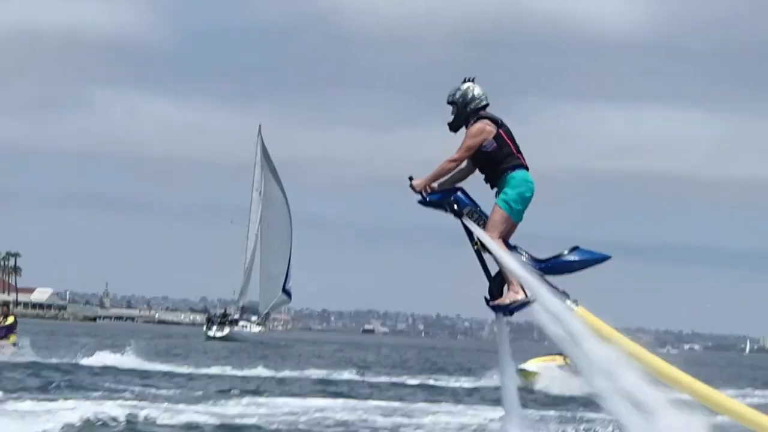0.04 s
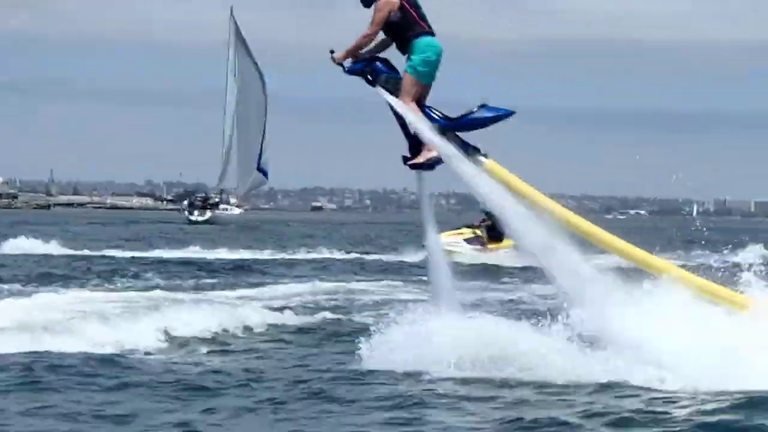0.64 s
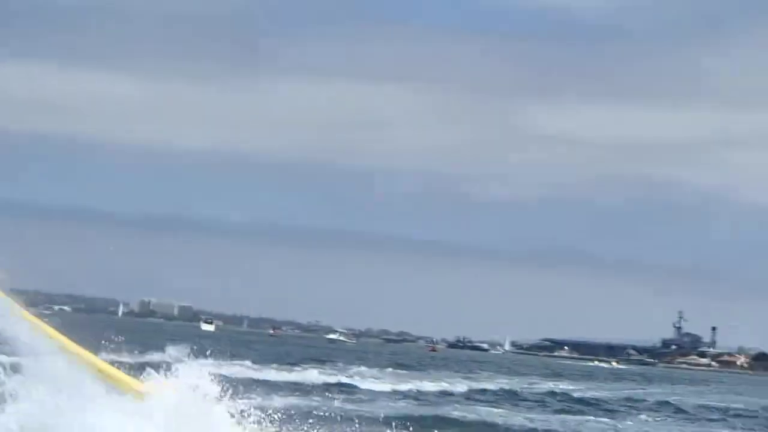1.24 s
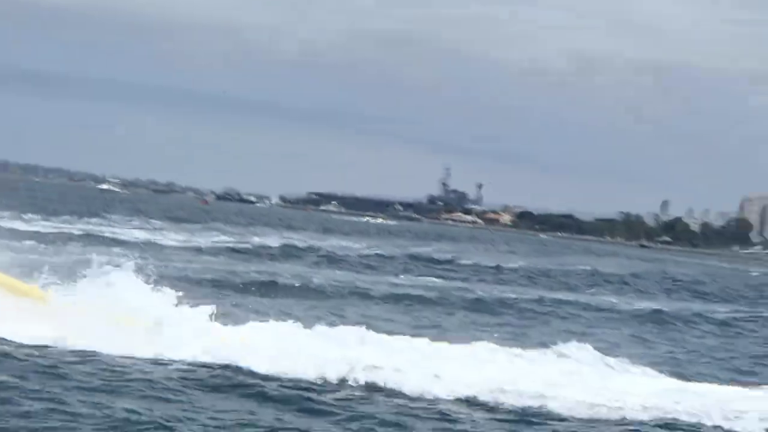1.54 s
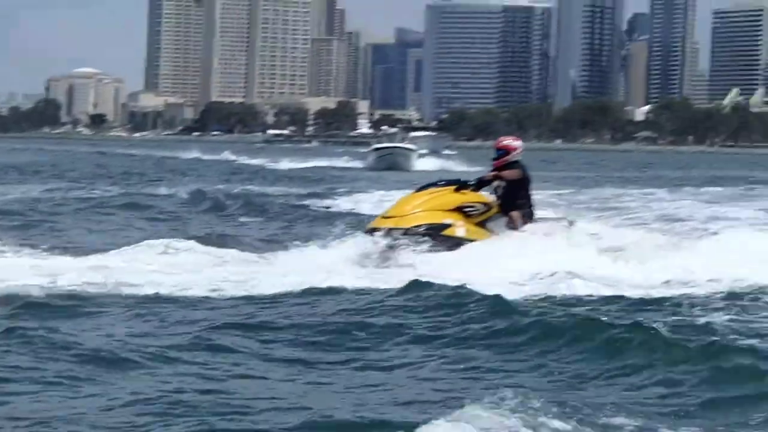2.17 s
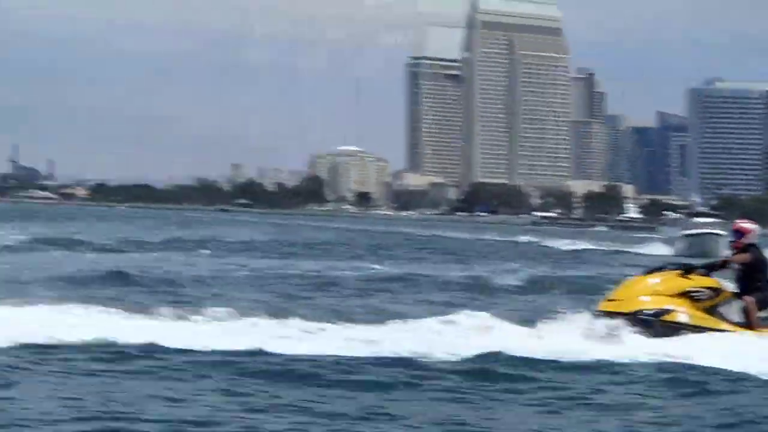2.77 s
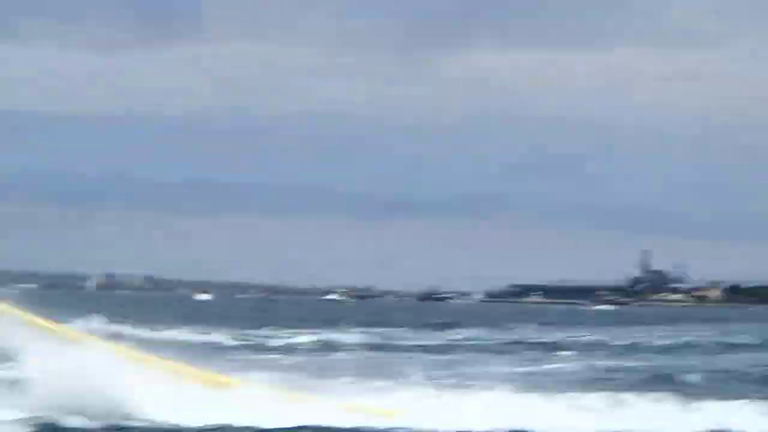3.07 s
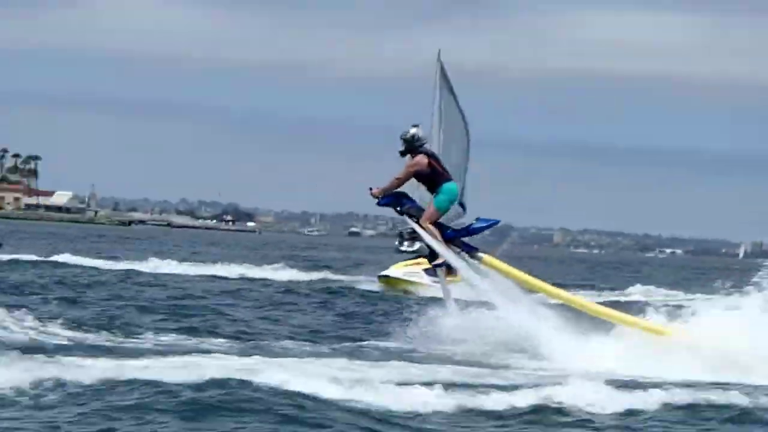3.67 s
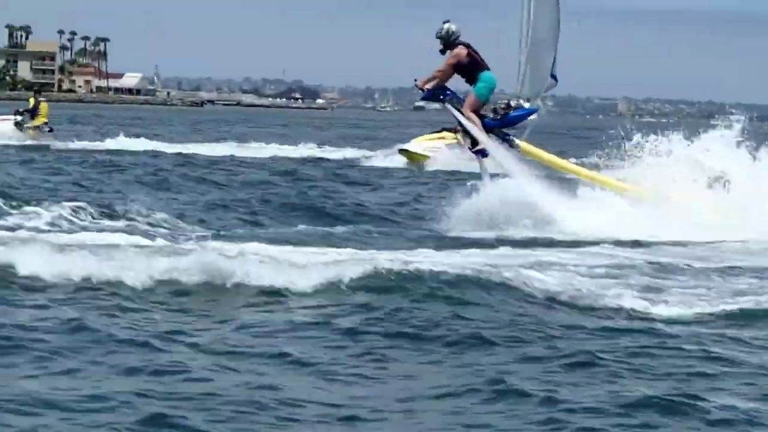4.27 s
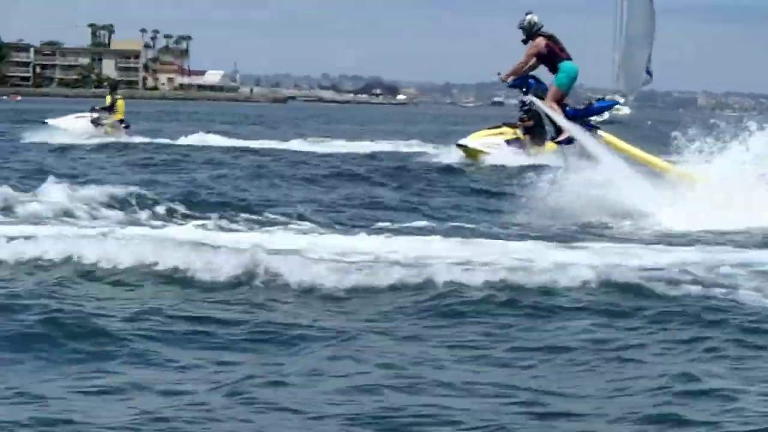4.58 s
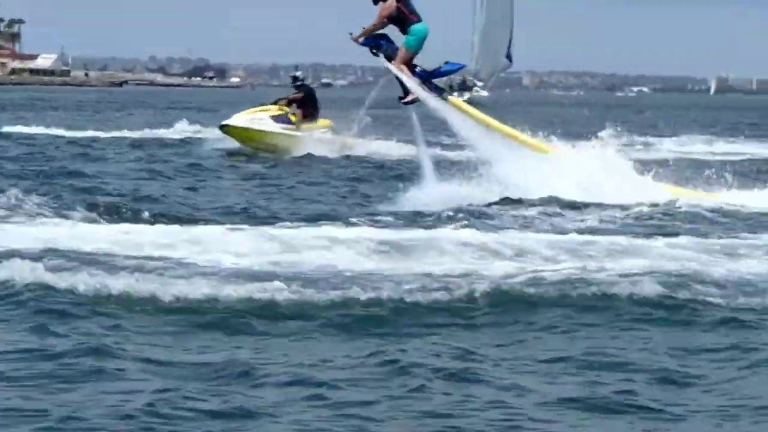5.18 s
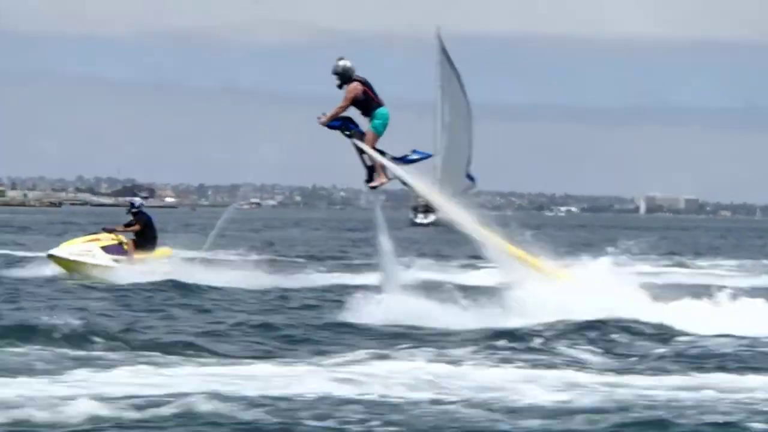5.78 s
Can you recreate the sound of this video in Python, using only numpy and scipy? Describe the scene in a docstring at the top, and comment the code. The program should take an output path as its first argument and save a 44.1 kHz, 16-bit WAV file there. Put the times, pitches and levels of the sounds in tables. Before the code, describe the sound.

A jet ski drones over churning water; a sharp knock brings a loud spray hiss, then wind buffets the microphone.

```python
"""A personal watercraft drones over the wash of a windy bay, with a light puff of wind at the start.
Its exhaust hums and rasps at the firing rate; the water churns and fizzes. One sharp knock overloads
the microphone, then a loud hiss like close spray swells and climbs in pitch: noise through two rising
resonances. It eases as gusts take over, their eddies fluttering on the microphone, with the engine
still humming underneath."""
import sys
import numpy as np
from scipy import signal
from scipy.fft import rfft, irfft
from scipy.io import wavfile

SR = 44100
rng = np.random.default_rng(int(sys.argv[2]) if len(sys.argv) > 2 else 0)


def pcm_store(signal):
    """Save signal as 16-bit PCM."""
    levels = np.round(np.clip(np.atleast_2d(signal), -1, 1) * 32767)
    wavfile.write(sys.argv[1], SR, levels.astype(np.int16).T)


N = 256662
T = np.arange(N) / SR

# The flow behind the close hiss. Each row: time in seconds, strength in dB.
HISS_FLOW = [(2.41, -26), (2.47, -21), (2.53, -17), (2.7, -18), (3.3, -19), (3.46, -29), (4.24, -30.5),
             (4.37, -25), (4.65, -25), (4.78, -27.5), (5.22, -27.5), (5.36, -25), (5.72, -30),
             (5.82, -26.5)]
# The hiss's body, sizzle and airy top, before any resonance. Each row: pitch in Hz, relative level in dB.
BODY_COLOUR = [(25, -29), (70, -10), (130, -3.5), (260, 0.5), (450, -8), (600, -2.5), (820, 2), (1400, 1),
               (2300, -4), (3400, -9), (4100, -11.5), (4700, -20.5), (8000, -10.5), (16000, -35)]
SIZZLE_COLOUR = [(2500, -29.5), (4700, 3.5), (5600, 7.5), (6600, 3.5), (8500, -7), (10000, -7),
                 (13000, -16), (16000, -30)]
AIR_COLOUR = [(6000, -25), (9500, -6), (12000, -3), (15000, -16)]
# The hiss's two resonances. Each lists: base pitch in Hz, climb in Hz, climb time in seconds,
# jump at the surge in Hz, sag in Hz per dB of weaker flow, width in Hz.
BODY_RESONANCE = (2614, 706, 0.23, 397, 7, 755)
SIZZLE_RESONANCE = (5740, 2460, 0.43, 610, 33, 1060)
# The lasting blow, and the air rumbling round the microphone. Each row: time in seconds, level in dB.
BLOW_LEVEL = [(2.3, -46), (3.27, -24), (3.32, -15.5), (3.41, -12.5), (3.5, -15.5), (3.93, -14.5),
              (4.04, -17), (4.6, -17), (5.15, -16), (5.82, -15.5)]
RUMBLE_LEVEL = [(0, -46), (.2, -37), (.35, -48), (.65, -40.5), (.85, -66), (2.3, -44), (3.35, -29),
                (3.65, -43), (4.3, -25), (4.75, -21.5), (5.0, -24.5), (5.3, -24), (5.6, -31), (5.82, -48)]
# The tone of the wind's buffet and rumble. Each row: frequency in Hz, relative level in dB.
BUFFET_COLOUR = [(25, -59), (80, -21), (150, -5), (250, -2.5), (350, -0.5), (470, -3), (570, 1), (700, 2),
                 (1050, -0.5), (1400, -7.5), (2000, -14.5), (3000, -26), (5000, -55), (12000, -63)]
RUMBLE_COLOUR = [(10, -26), (28, -32), (50, -8), (85, 4.5), (160, 1.5), (240, 14), (400, 8.5), (900, -70)]
# The main breaks in the airflow. Each row: centre in seconds, depth in dB, length in seconds.
LULLS = [(3.449, -6, .012), (3.706, -5.5, 0.016), (4.216, -1, 0.013), (4.353, -7, 0.026), (4.506, -7, .016),
         (4.723, -5, 0.04), (4.773, -15, .01), (4.868, -14, 0.017), (4.92, -20, 0.0088), (5.05, -14, .009),
         (5.327, -12, 0.045), (5.398, -11, 0.012), (5.45, -20, .017), (5.751, -4.5, 0.043)]
# The knock and its rebound. Each row: start in seconds, strength in dB, polarity, ring in Hz,
# seconds to die by 60 dB.
KNOCK_PULSES = [(2.40052, 10, -1, 900, .0036), (2.40235, 0, 1, 240, .005)]
# The engine sags under load and picks up. Each row: time in seconds, firing rate in Hz, hum level in dB.
ENGINE_RUN = [(0, 112.8, -39), (.6, 110.7, -38.5), (.95, 111.5, -35.5), (1.7, 114.8, -35.5),
              (1.98, 101.8, -37.5), (2.3, 95.1, -36), (2.42, 97, -37), (2.53, 99, -26), (2.9, 97.3, -27.5),
              (3.3, 103.7, -25.5), (3.5, 107.8, -40), (4.55, 118.7, -32), (5.15, 116.8, -32),
              (5.82, 112, -37)]
# The harmonics of the exhaust. Each row: multiple of the firing rate, relative level in dB.
EXHAUST_ORDERS = [(1, -1.5), (2, -7.5), (3, -16), (4, -27)]
# The exhaust rasp. Each row: time in seconds, level in dB.
RASP_LEVEL = [(0, -34), (1.3, -33.5), (1.8, -31), (2.7, -32.5), (3.3, -31), (3.6, -32.5), (5.82, -40)]
# Exhaust and hull resonances. Each row: centre in Hz, width in Hz, relative gain in dB.
RASP_MODES = [(939, 174, 0), (1316, 317, 2.5), (2123, 300, -3)]
# The tone of churning water and of foam. Each row: frequency in Hz, relative level in dB.
CHURN_COLOUR = [(25, -18), (60, -9), (130, -0.5), (170, -3), (260, -0.5), (460, -9), (700, -0.5),
                (1000, -2), (1500, -3), (2000, -6.5), (2550, -16), (4000, -52)]
FIZZ_COLOUR = [(1800, -16), (2900, 4), (3600, 1), (4200, -2.5), (5150, -5), (5900, 3), (6600, -0.5),
               (7500, -13.5), (8200, -7.5), (9900, -21), (11100, -15.5), (12300, -21.5), (13700, -20),
               (16000, -30)]

HISS_START_S, HISS_ATTACK_S, SURGE_S = 2.402, 0.015, 2.655


def hiss(trim_db=3, full_flow_db=-15, air_growth=1.67):
    """A close, spray-like hiss: its flow rides level, pitch and brightness, and one surge lifts it."""
    flow_db, = in_time(HISS_FLOW)
    excess_db = flow_db - full_flow_db
    surge = opening(SURGE_S, attack_s=0.0075)
    overshoot_db = 0.5 * surge * (1 - opening(SURGE_S, attack_s=0.027))
    level_db = trim_db + flow_db + 0.5 * drift(21) + overshoot_db
    # the sizzle comes forward at the surge and with stronger flow
    bright_db = -16.5 * (1 - surge) - 9 * surge + 0.23 * excess_db
    body = climbing(turbulence(BODY_COLOUR, lumpy_db=0.8, rate=71), BODY_RESONANCE, surge, excess_db)
    sizzle = turbulence(SIZZLE_COLOUR, lumpy_db=1.0, rate=52)
    sizzle = from_db(bright_db) * climbing(sizzle, SIZZLE_RESONANCE, surge, excess_db)
    # the airy top grows faster than the rest, so only the strongest flow has it
    air_db = -11 + air_growth * (level_db + bright_db)
    air = from_db(air_db) * turbulence(AIR_COLOUR, lumpy_db=2.5, rate=50)
    return opening(HISS_START_S, HISS_ATTACK_S) * (from_db(level_db) * (body + sizzle) + air)


def climbing(noise, resonance, surge, excess_db, block=128):
    """A resonant low-pass that sweeps up, jumps at the surge and sags as the flow weakens; rms 1."""
    base_hz, climb_hz, climb_s, jump_hz, sag_hz_per_db, width_hz = resonance
    hz = base_hz + climb_hz * opening(HISS_START_S, climb_s) + jump_hz * surge + sag_hz_per_db * excess_db
    radius = np.exp(-np.pi * width_hz / SR)
    out, state = np.zeros(N), np.zeros(2)
    for i in range(0, N, block):
        angle = 2 * np.pi * hz[i] / SR
        feedback = [1, -2 * radius * np.cos(angle), radius * radius]
        out[i:i + block], state = signal.lfilter([sum(feedback)], feedback, noise[i:i + block], zi=state)
    return rms_one(out)


def wind(eddies_per_s=75, flutter_db=2.0, ceiling_db=5.5, headroom=2.75):
    """Eddies buffet the microphone and flatten at their peaks: a light puff, later a lasting blow."""
    blow_db, = in_time(BLOW_LEVEL)
    rumble_db, = in_time(RUMBLE_LEVEL)
    puff = from_db(-29 - 140 * since(0.23))  # holds briefly, then dies away
    gust = puff + from_db(blow_db + lulls(rumble_db))
    # the flutter drops further than it rises
    eddy_db = np.minimum(flutter_db * drift(eddies_per_s), ceiling_db)
    buffet = coloured(rng.standard_normal(N) * from_db(eddy_db), BUFFET_COLOUR)
    buffet = rms_one(np.tanh(buffet / headroom))
    rumble = turbulence(RUMBLE_COLOUR, lumpy_db=2.0, rate=36)
    return gust * buffet + from_db(rumble_db) * rumble


def lulls(rumble_db, breaks_per_s=10, deepest_db=-10):
    """Dips in dB where the airflow breaks off: the main lulls, plus chance ones deepening with rumble."""
    gaps_s = rng.uniform(.5, 1.5, 200) / breaks_per_s
    short_breaks = sum(bell(s, length_s=.009) for s in np.cumsum(gaps_s) if s < T[-1])
    hardness = from_db(0.76 * (rumble_db - rumble_db.max()))
    main_db = sum(depth_db * bell(s, length_s) for s, depth_db, length_s in LULLS)
    return deepest_db * hardness * short_breaks + main_db


def knock(phase_rad=0.7, soften_hz=5500):
    """A sudden pressure step on the microphone and its rebound, each dying within a few cycles."""
    out = np.zeros(N)
    for start_s, db, polarity, hz, t60 in KNOCK_PULSES:
        age = since(start_s)
        envelope = (T > start_s) * from_db(db - 60 * np.minimum(age / t60, 10))
        out += np.sign(polarity) * envelope * np.cos(2 * np.pi * hz * age - phase_rad)
    return signal.sosfilt(signal.butter(2, soften_hz, fs=SR, output="sos"), out)


def engine_hum(phase, hum_db):
    """The low exhaust harmonics, wavering as the hull rides the chop."""
    out = 0
    for order, db in EXHAUST_ORDERS:
        waver_db = (1.0 if order == 1 else 1.5) * drift(41)
        out += from_db(db + waver_db) * np.sin(order * phase + rng.uniform(0, 2 * np.pi))
    return from_db(hum_db) * np.sqrt(2) * out


def exhaust_rasp(phase, throb=0.23):
    """Each firing pushes a puff of noise through the exhaust and hull resonances."""
    rasp_db, = in_time(RASP_LEVEL)
    puffs = rng.standard_normal(N) * (1 + throb * np.sin(phase))
    out = 0
    for hz, width, db in RASP_MODES:
        band = signal.butter(2, [hz - width / 2, hz + width / 2], "band", fs=SR, output="sos")
        out += from_db(db) * signal.sosfilt(band, puffs)
    return from_db(rasp_db) * rms_one(out)


def wash(wake_s=1.45, drop_db=7.5, fade_db_per_s=5.5):
    """A bed of churning water and foam, fizzier with a fresh wake; it sinks away behind the hiss."""
    churn = from_db(-32.4) * turbulence(CHURN_COLOUR, lumpy_db=1.5, rate=6.3)
    fizz_db = -41.5 + 2.8 * opening(wake_s, attack_s=.1)
    fizz = from_db(fizz_db) * turbulence(FIZZ_COLOUR, lumpy_db=0.7, rate=37)
    sunk_db = drop_db * opening(HISS_START_S, HISS_ATTACK_S) + fade_db_per_s * since(HISS_START_S)
    return from_db(-sunk_db) * (churn + fizz)


def turbulence(colour, lumpy_db, rate):
    """Noise that comes in eddies, about rate a second; rms 1."""
    return coloured(rng.standard_normal(N) * from_db(lumpy_db * drift(rate)), colour)


def coloured(x, colour):
    """Equalise a signal with a colour curve; rms 1."""
    hz = np.maximum(np.arange(N // 2 + 1) * SR / N, 1)
    points_hz, db = np.transpose(colour)
    gain = from_db(np.interp(np.log(hz), np.log(points_hz), db))
    return rms_one(irfft(rfft(x) * gain, N))


def drift(rate):
    """A smooth random wobble, changing about rate times a second; rms 1."""
    hz = np.arange(N // 2 + 1) * SR / N
    return rms_one(irfft(rfft(rng.standard_normal(N)) / (1 + (hz / rate) ** 2), N))


def in_time(rows):
    """One automation curve for each column after the time, in straight ramps."""
    times, *columns = np.transpose(rows)
    return [np.interp(T, times, column) for column in columns]


def since(start_s):
    """Seconds since a cue, zero before it."""
    return np.maximum(T - start_s, 0)


def opening(start_s, attack_s):
    """A fade from 0 towards 1, starting on a cue."""
    return 1 - np.exp(-since(start_s) / attack_s)


def bell(centre_s, length_s):
    """A bell-shaped envelope of height 1, length_s wide at half height."""
    return 2 ** -np.minimum((2 * (T - centre_s) / length_s) ** 2, 20)


def from_db(db):
    """Decibels to gain."""
    return 10 ** (np.asarray(db) / 20)


def rms_one(x):
    """Scale to unit rms."""
    return x / np.sqrt(np.mean(x ** 2) + 1e-20)


def scene():
    """Engine, water, hiss, wind and knock, mixed at one microphone."""
    firing_hz, hum_db = in_time(ENGINE_RUN)
    phase = 2 * np.pi * np.cumsum(firing_hz * (1 + 0.004 * drift(11.4))) / SR
    watercraft = engine_hum(phase, hum_db) + exhaust_rasp(phase)
    return (watercraft + wash() + hiss() + wind() + knock())[None]


def record(dry, cutoff_hz=15700):
    """The knock clips the input, and a steep low-pass takes off the very top."""
    clipped = np.clip(dry, -1, 1)
    return signal.sosfilt(signal.ellip(10, .1, 80, cutoff_hz, fs=SR, output="sos"), clipped)


dry = scene()
out = record(dry)
pcm_store(out)
```